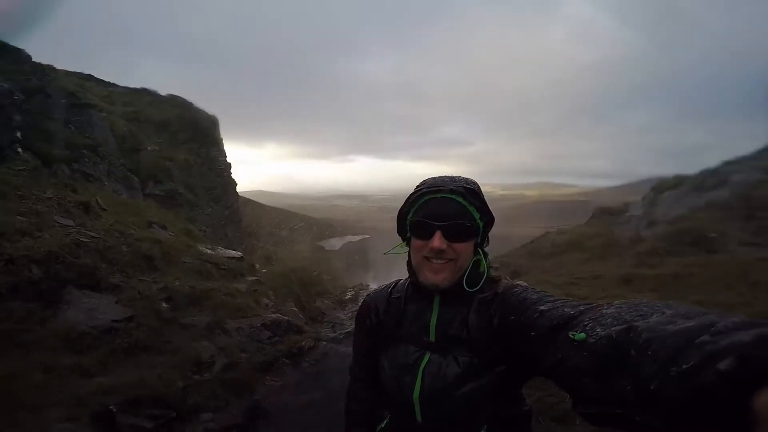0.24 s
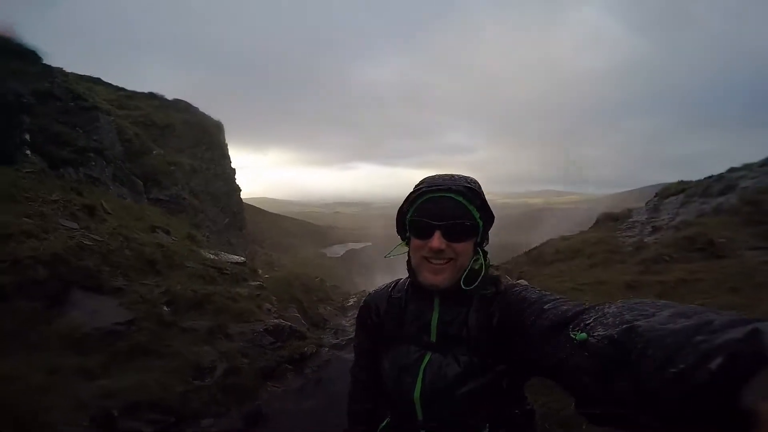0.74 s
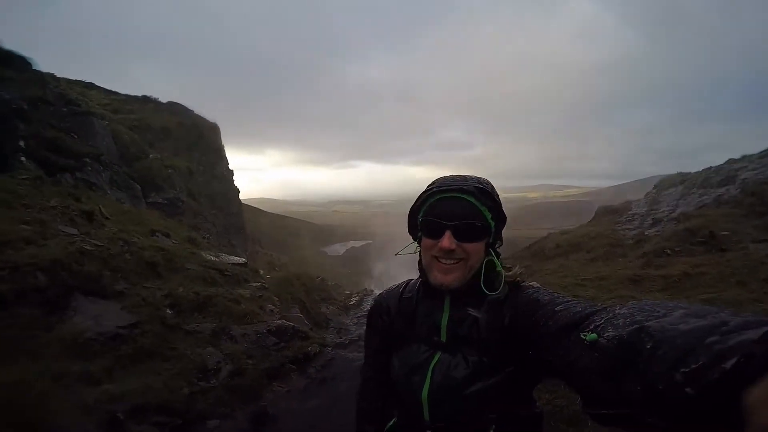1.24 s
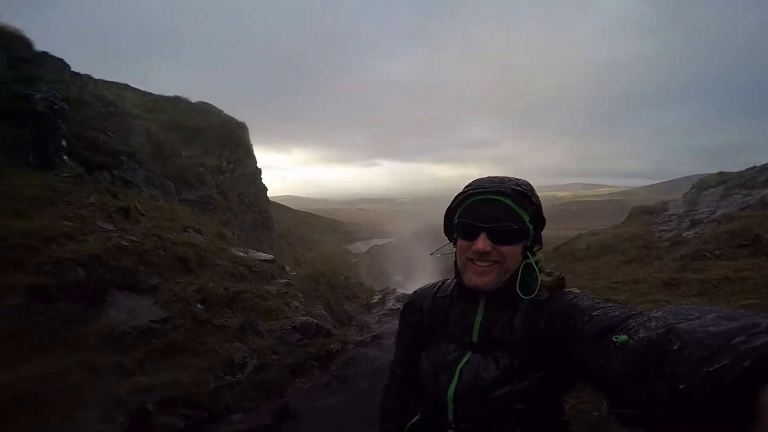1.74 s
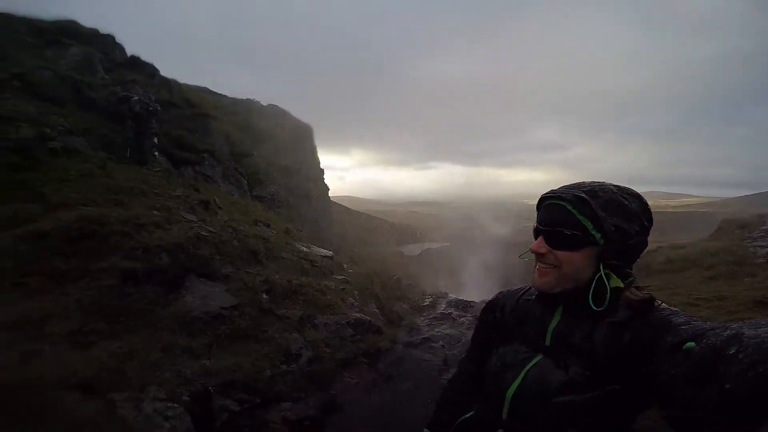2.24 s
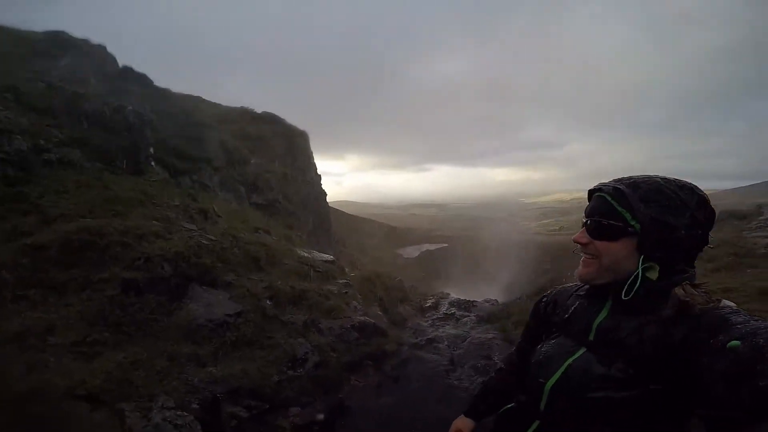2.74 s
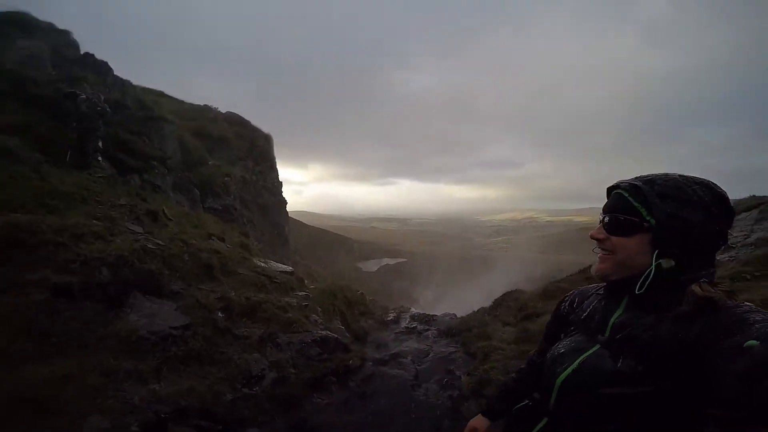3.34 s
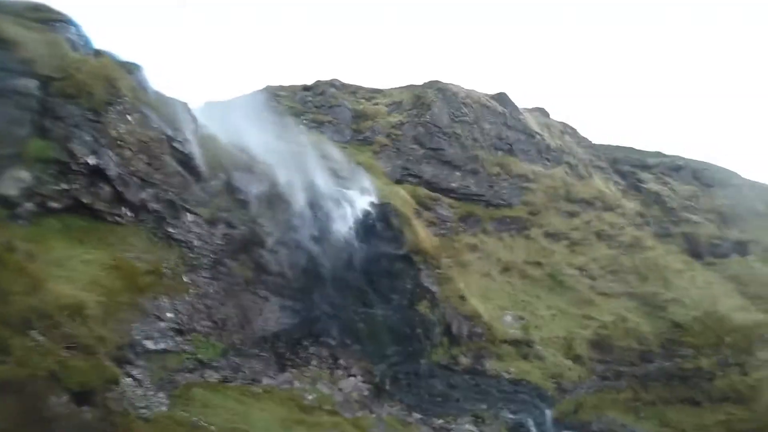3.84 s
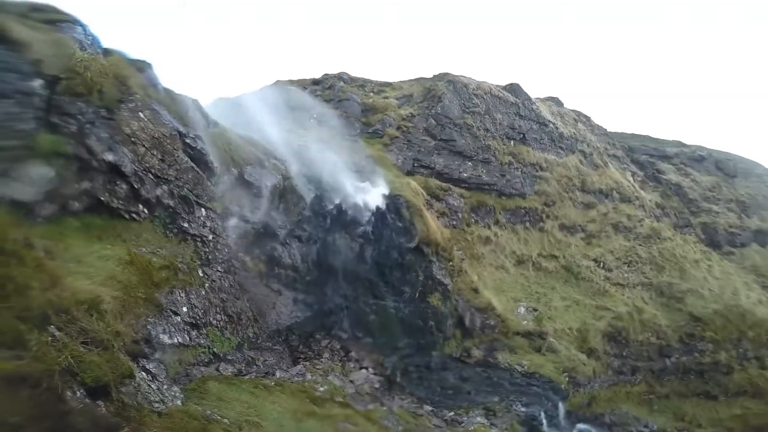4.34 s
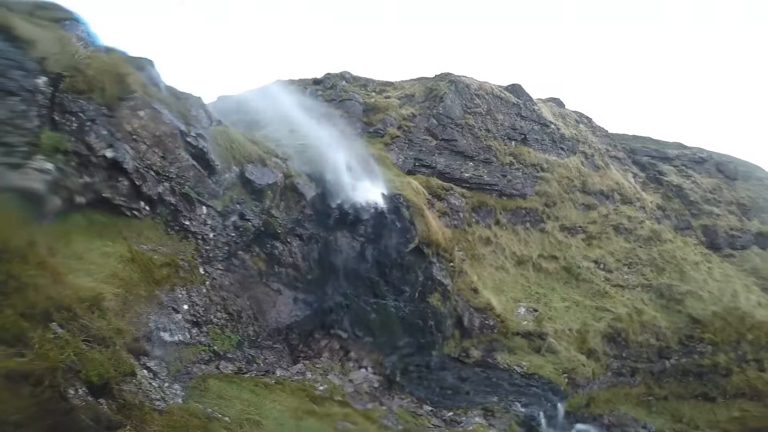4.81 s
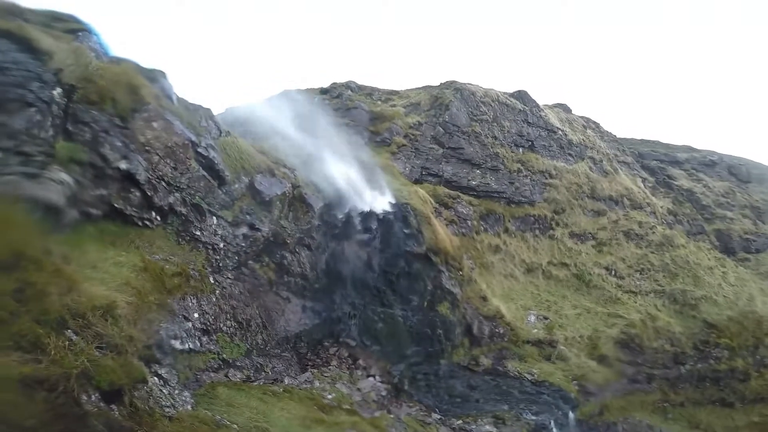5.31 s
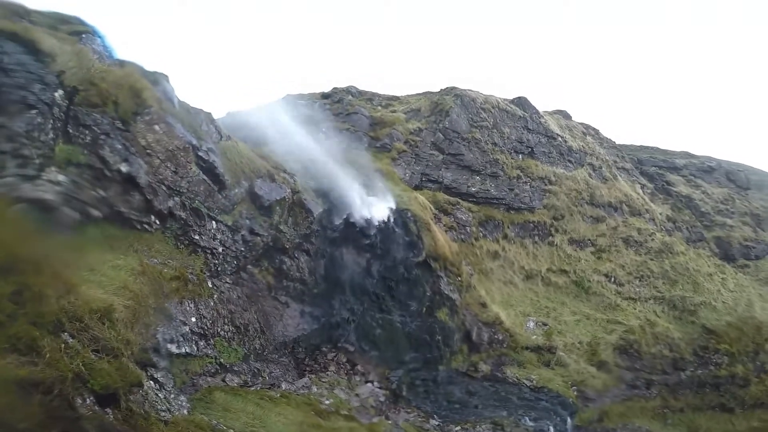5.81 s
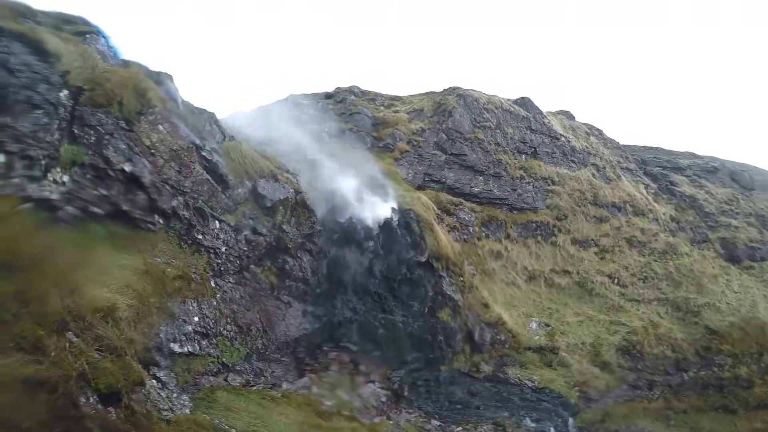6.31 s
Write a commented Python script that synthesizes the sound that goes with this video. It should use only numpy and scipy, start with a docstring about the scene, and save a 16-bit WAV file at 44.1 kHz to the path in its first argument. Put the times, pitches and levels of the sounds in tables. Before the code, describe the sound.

Water drops patter on a small camera's case in a buffeting gale; after a brief dropout, harder gusts puff against the microphone.

```python
"""Gale on a bare hillside, heard by a small camera in a hard case. From the start, eddies thump the
membrane, air rushing over the port rings its cavity, and blown spray ticks on the case over the faint
hiss of a distant waterfall. At 3.5 s the sound drops out and stutters. It resumes at another spot, where
harder gusts punch puffs into the port and the spray wets the case just once, around 5 s."""
import sys
import numpy as np
from scipy import signal
from scipy.fft import rfft, irfft
from scipy.io import wavfile
from scipy.ndimage import uniform_filter1d

SR = 44100
rng = np.random.default_rng(int(sys.argv[2]) if len(sys.argv) > 2 else 0)


def generate_wav(signal):
    """Clip the signal to [-1, 1] and save it as 16-bit WAV at the path in sys.argv[1]."""
    frames = np.transpose(np.atleast_2d(signal))
    scaled = np.clip(frames, -1, 1) * 32767
    pcm = np.round(scaled).astype(np.int16)
    wavfile.write(sys.argv[1], SR, pcm)


N = 289296

# wind rumble on the membrane, one envelope each side of the dropout: t/s, level/dB
GUST_ENVELOPES = [
    [(0.0, -41), (0.1, -31), (0.15, -40), (0.32, -38.5), (0.38, -21), (0.46, -27), (0.54, -15.5),
     (0.65, -37), (0.76, -18.5), (0.82, -25), (0.88, -19), (0.93, -28), (1.12, -36.5), (1.43, -40),
     (1.51, -23), (1.65, -38), (1.8, -32), (1.9, -46), (1.98, -31.5), (2.06, -47), (2.48, -48),
     (2.52, -28.5), (2.57, -40), (2.66, -37), (3.0, -49), (3.17, -34), (3.37, -45.5), (3.44, -27),
     (3.5, -50)],
    [(3.68, -18.5), (3.79, -13.5), (3.85, -7), (3.93, -35.5), (3.98, -24.5), (4.3, -30), (4.41, -21.5),
     (4.49, -43.5), (4.6, -23.5), (4.67, -27.5), (4.76, -15.5), (4.82, -17.5), (4.96, -40.5), (5.05, -25),
     (5.28, -31.5), (5.4, -58), (5.47, -26), (5.79, -23.5), (5.84, -36), (5.92, -25.5), (5.96, -32.5),
     (6.08, -22.5), (6.16, -30), (6.25, -24), (6.39, -23), (6.43, -29.5), (6.56, -26)],
]
# air over the port, one envelope each side of the dropout: t/s, level/dB
RUSH_ENVELOPES = [
    [(0.0, -35), (0.073, -39), (0.124, -41.5), (0.3, -32.5), (0.384, -27), (0.558, -24.5), (0.612, -38),
     (0.729, -24), (0.9, -39.5), (0.992, -32), (1.529, -33.5), (1.657, -39), (1.781, -37), (1.9, -58),
     (2.03, -41), (2.217, -59), (2.6, -51.5), (2.96, -41), (3.0, -51), (3.5, -48)],
    [(3.676, -24), (3.78, -14), (3.87, -14), (3.9, -38.5), (4.009, -41), (4.057, -27.5), (4.162, -27.5),
     (4.239, -42.5), (4.393, -38), (4.55, -51), (4.597, -26), (4.677, -25.5), (4.734, -42), (4.795, -24.5),
     (4.874, -43.5), (5.107, -25), (5.29, -42.5), (5.334, -50), (5.43, -43), (5.48, -28), (5.629, -25.5),
     (5.755, -32.5), (5.866, -38), (5.919, -24.5), (5.98, -43.5), (6.041, -26.5), (6.122, -32.5),
     (6.25, -29), (6.3, -27), (6.457, -37.5), (6.5, -32), (6.56, -23)],
]
# sudden puffs into the port: t/s, level/dB
PORT_PUFFS = [(3.6765, -15), (3.7531, -29), (3.7916, -4), (3.8365, -3), (3.9466, -10.5), (4.049, -10),
              (4.0642, -13.5), (4.179, -21), (4.379, -14), (4.3918, -10), (4.5777, -20.5), (4.658, -24),
              (4.77, -24), (4.8153, -15.5), (5.0226, -16), (5.052, -14), (5.085, -4), (5.118, -1.5),
              (5.2475, -18.5), (5.28, -19.5), (5.4953, -20), (5.61, -13.5), (5.8505, -19.5), (5.896, -7.5),
              (6.009, -11.5), (6.0775, -30), (6.235, -29), (6.2823, -8), (6.487, -10)]
# tone of the cavity behind the port: f/Hz, relative level/dB
PORT_EQ = [(180, -38), (300, -20), (535, -29), (849, -23.5), (1350, -12), (1970, -7.5), (2320, 0.5),
           (2690, -12), (3280, -17), (3690, -30), (6790, -36), (8280, -55), (9140, -38.5), (13400, -93),
           (15500, -93)]
# large drops hitting the case: t/s, peak level/dB, ring f/Hz, crack level against the ring/dB
DROP_HITS = [(.0088, -6.5, 1250, -11.5), (0.1798, -9, 1910, -13), (.1908, -17, 3040, -15),
             (.2033, -6, 1280, -6.5), (.2202, -10, 3000, -23), (0.2448, -7.5, 1400, -15),
             (0.2777, 0.5, 1300, -36), (.2906, -8, 3000, -17), (.3263, -4.5, 1350, -11),
             (0.3403, 4, 1230, -25), (0.3538, -10, 3060, -8), (0.373, -11, 5210, -16),
             (0.3881, -3.5, 3080, -12), (0.4027, -4, 1800, -16), (0.4094, -9, 2280, -30),
             (0.4299, -9, 3120, -11), (.4339, -6.5, 2960, -19), (0.4563, -4.5, 2300, -6),
             (0.4594, -3.5, 1310, -11), (0.522, -3, 1410, -21), (.5265, -4, 2100, -12),
             (0.5727, -8.5, 1850, -9), (0.678, -11, 3000, -5.5), (.6952, -5.5, 1850, 0),
             (0.7128, 5, 4410, -1), (1.042, -11, 2740, -10), (1.1249, -10, 3040, -22),
             (1.2572, -2.5, 2940, -11), (1.2632, -11, 3600, -14), (1.3897, -13, 3010, -4),
             (1.4134, -3, 2390, -7), (1.4192, -6, 2870, -17), (1.4397, -12, 2820, -2),
             (1.4595, -4.5, 1410, -23), (1.4738, -9, 1860, -4), (1.4826, -8.5, 2430, -12),
             (1.516, -7, 2380, -4), (1.5321, -10.5, 1960, -18), (1.539, -3.5, 3530, 1),
             (1.5861, -15, 2500, -3), (1.6631, -9, 2840, -2.5), (1.6816, -16, 3200, -12),
             (1.6947, -5.5, 1840, -10), (1.7213, -10, 1910, -1), (1.7684, -8.5, 3000, -5),
             (1.7928, -4.5, 2380, -31), (1.8222, -3.5, 2960, -12), (1.8438, -13, 2990, -4),
             (1.8715, -12.5, 2460, -1), (1.8745, -6, 1950, -5.5), (1.902, -20, 2040, -14),
             (1.9166, -17, 1850, 3), (1.9205, -12, 2460, -9), (1.9466, -6, 2570, -10),
             (1.957, -8, 1890, -3), (1.9843, -6.5, 2080, -17), (1.9927, 5.5, 1947, -31),
             (2.0019, 2, 2300, -8), (2.0188, -14, 1860, -17), (2.031, -9, 2000, -5),
             (2.0429, -8, 1790, -16), (2.058, -5, 2340, -21), (2.0762, -7.5, 2720, -31),
             (2.1146, -13, 2460, -18), (2.1308, -14.5, 2430, -17), (2.1741, -13.5, 1700, -6.5),
             (2.1799, -14, 2500, -16), (2.218, -12.5, 2410, -26), (2.244, -18.5, 3500, -5),
             (2.2487, -16.5, 1900, -1), (2.272, -19, 2310, -4), (2.303, -21.5, 2600, -4),
             (2.3702, -2.5, 2300, -18), (2.3856, -16, 1960, -13), (2.4, -12, 1810, -25),
             (2.4062, 1.5, 1870, -19), (2.454, -6, 2360, -22), (2.4583, -5, 2360, -30),
             (2.4774, -7, 1820, -22), (2.518, -17, 2930, -20), (2.5255, -3.5, 2710, -6.5),
             (2.542, -20, 3000, -8), (2.554, -17, 2200, -12), (2.56, -20, 3000, -6),
             (2.5718, -17, 1960, -10), (2.6616, 1.5, 1980, -14), (2.7139, -9, 2060, -34),
             (2.7295, -13, 2030, -21), (2.7468, -6, 1520, -13), (2.8016, -6.5, 1720, -2),
             (2.8057, -11, 2310, -12), (2.818, -9.5, 855, -24), (2.8235, -3.5, 2470, -21),
             (2.8304, -3, 1950, -14), (2.8363, -8, 2490, -18), (2.8424, 1.5, 2920, -25),
             (2.8628, -11, 2720, -3), (2.8752, -15, 1890, -1), (2.9004, 2.5, 3680, -10.5),
             (2.902, -11, 2700, -15), (2.9114, -8, 1200, -30), (2.939, -5.5, 2970, -6),
             (2.9544, -9, 2900, -8), (2.9574, -11.5, 2930, -10), (2.9617, -9, 2260, 1),
             (2.993, -11.5, 1910, -7), (3.0168, -13.5, 940, -23), (3.0238, -11.5, 2620, -4),
             (3.074, -0.5, 2050, -6.5), (3.1194, -6.5, 2500, -17), (3.1216, -6, 1960, -17),
             (3.1316, -5.5, 2180, -28), (3.1834, -8.5, 2460, -5), (3.2746, -3.5, 3110, -20),
             (3.2815, -7.5, 2630, 1), (3.3184, -14.5, 1150, -33), (3.3384, -2.5, 3830, -17.5),
             (3.3464, 4, 2900, -7), (3.3951, -6.5, 2060, -7), (3.4105, -12, 3260, 7),
             (3.431, -11, 2570, -4), (3.4376, -5.5, 2470, -8), (3.4664, -6.5, 3020, -9),
             (3.4944, -9.5, 2260, -20), (4.4308, -23, 3440, -9), (4.916, -11, 4520, 2),
             (4.931, -7.5, 4370, -1), (4.9508, -10, 5650, 12), (4.9789, -14.5, 6600, -7),
             (5.027, -6.5, 5600, 1.5), (5.034, -6, 4630, 8), (5.0609, -6.5, 5600, 1),
             (5.0862, -11.5, 5360, -3), (5.1166, -6.5, 2990, 17), (5.1197, 6, 2240, -12),
             (5.1254, 5.5, 4400, -24), (5.1606, -27, 3400, 5), (5.187, -26.5, 4840, -1),
             (6.1055, -27.5, 4540, 9)]
# tone of the case under a tick: f/Hz, relative level/dB
CASE_EQ = [(180, -90.5), (300, -8), (774, -15), (1840, 5.5), (2140, -5.5), (2740, 2), (4300, -4),
           (4750, -9.5), (5340, -6), (8090, -22.5), (11700, -33), (13800, -36), (16000, -118.5)]
# spells when spray wets the case: start t/s, end t/s
WET_SPELLS = [(0, 3.62), (4.91, 5.14)]
# bursts of fine spray and bright tearing: start t/s, end t/s, level/dB
SPRAY_BURSTS = [(0.06, 0.111, -39.5), (0.165, .33, -57), (0.333, 0.462, -35.5), (0.475, 0.589, -43),
                (0.637, 0.752, -47), (0.948, 1.196, -42.5), (1.194, 1.541, -39.5), (1.55, 1.607, -49),
                (1.678, 1.73, -47), (1.739, 1.82, -44), (1.83, 2.2, -61.5), (2.763, 2.968, -52.5),
                (2.97, 3.5, -61), (3.677, 3.744, -43), (3.746, 3.825, -32), (3.817, 3.861, -26.5),
                (4.027, 4.09, -54), (4.375, 4.412, -47), (4.575, 4.702, -45.5), (4.758, 4.834, -40),
                (4.902, 5.138, -50.5), (5.46, 5.66, -53), (5.89, 5.93, -54), (6.026, 6.048, -39.5),
                (6.25, 6.33, -62), (6.464, 6.56, -55)]
# tone of the distant waterfall: f/Hz, relative level/dB
WATERFALL_EQ = [(120, -47), (200, -9), (647, -13), (1500, -2), (2400, -1.5), (3430, -18), (4350, -6.5),
                (4680, -8), (5330, -10), (7300, -14), (8200, -22.5), (11700, -19.5), (14900, -30),
                (16000, -48)]
# snippets replayed inside the dropout: start t/s, end t/s, jump back/s
STUTTERS = [(3.5208, 3.5678, .0667), (3.5875, 3.6218, .1334)]

PUFF_RISE_S, PUFF_T60_S = 0.0025, 0.029
PATTER_PER_S, PATTER_HZ = 45, 2490
PATTER_OVER_SPRAY_DB, PATTER_SPREAD_DB, PATTER_CRACK_DB = 23, 2.5, -1.5
DROPOUT_S, RESUME_S, HIGH_CUT_HZ = 3.5012, 3.6762, 15600


def wind_buffet(gust_db):
    """Large eddies thump the membrane evenly; quicker, spikier small ones grow faster with the gust."""
    large = band(rng.standard_normal(N), 18.7, 54.7)
    large = unit(large / uniform_filter1d(large ** 2, int(0.054 * SR)) ** 0.35)  # compress the swells
    small = unit(undb(4.4 * walk(40)) * band(rng.standard_normal(N), 49, 126.5))
    roar = unit(undb(4 * walk(70)) * band(rng.standard_normal(N), 160, 424))
    small_gain = undb(-5 + 0.21 * (gust_db + 8.5))
    roar_gain = undb(-25.5 + 0.75 * (gust_db + 13))  # only the hardest gusts reach this high
    return undb(gust_db) * (large + small_gain * small + roar_gain * roar)


def port_rush(rush_db):
    """Turbulent air rings the cavity behind the port: a fluttering rush plus sudden puffs."""
    wet = wetness()  # spray breaks the slow surges into quick specks
    flutter_db = (2.6 - 2.4 * wet) * walk(53) + 4 * walk(220) + 3 * wet * walk(600)
    envelope = undb(rush_db) * unit(undb(flutter_db))
    t = np.arange(int(.08 * SR)) / SR
    puff = (1 - np.exp(-t / PUFF_RISE_S)) * np.exp(-np.log(1000) * t / PUFF_T60_S)
    for s, level_db in PORT_PUFFS:
        add(envelope, s, undb(level_db) * puff)
    return unit(colour(rng.standard_normal(N), PORT_EQ)) * envelope


def drop_hit(hz, crack_db, hiss):
    """A drop's push swells and collapses over a few cycles of case ring, with a crack and a rough tail."""
    t = np.arange(len(hiss)) / SR
    contact_s = 0.00054 * (2000 / hz) ** 0.26  # small, high drops touch more briefly
    push = t / contact_s * np.exp(1 - t / contact_s)
    grit = unit(band(hiss, 0.6 * hz, 1.11 * hz, order=1))
    ring = push * (np.sin(2 * np.pi * hz * t) + 0.23 * grit)
    tail = undb(-6.5) * unit(colour(hiss, CASE_EQ)) * np.exp(-t / 0.0017)
    crack = unit(band(hiss[::-1], 2330, 8600)) * push ** 2
    thump = undb(-23) * np.sin(2 * np.pi * 220 * t) * np.exp(-t / 0.0019)  # the whole case is nudged
    hit = ring / np.abs(ring).max() + tail + thump + undb(crack_db) * crack / np.abs(crack).max()
    return hit / np.abs(hit).max()


def drops_on_case(spray_db, patter_count=330):
    """Large drops, pitched by where they land, over a random patter that is louder in thick spray."""
    out = np.zeros(N)
    for s, peak_db, hz, crack_db in DROP_HITS:
        add(out, s, undb(peak_db) * drop_hit(hz, crack_db, rng.standard_normal(600)))
    draws = rng.standard_normal((patter_count, 603))  # per drop: level, pitch, crack, then its hiss
    times = np.cumsum(rng.exponential(size=patter_count)) / PATTER_PER_S
    envelope = undb(spray_db + PATTER_OVER_SPRAY_DB) * wetness()
    for s, draw in zip(times[times < N / SR], draws):
        gain = envelope[int(s * SR)] * undb(PATTER_SPREAD_DB * draw[0])
        hz = PATTER_HZ * np.exp(0.33 * draw[1])
        add(out, s, gain * drop_hit(hz, PATTER_CRACK_DB + 6 * draw[2], draw[3:]))
    return out


def fine_spray(spray_db, ticks_per_s=450, spread_db=4, shapes=6):
    """Tiny droplets tick on the case while spray blows, over a bright, fluttering tearing."""
    ticks = np.zeros(N)
    t = np.arange(300) / SR
    for _ in range(shapes):
        hits = (rng.random(N) < ticks_per_s / shapes / SR) * undb(spread_db * rng.exponential(size=N))
        grain = rng.standard_normal(len(t)) * t * np.exp(-t / .0003)
        ticks += signal.fftconvolve(hits, grain)[:N]
    flutter = undb(3.3 * walk(130))
    hiss = band(rng.standard_normal(N), 2000, 6400, order=1)
    tearing = unit(flutter * band(hiss, 460, 11000, order=1))
    wet = wetness()
    sizzle = undb(11) * wet * unit(colour(ticks, CASE_EQ))
    return undb(spray_db) * (sizzle + undb(-1.5 + 2.7 * wet) * tearing)


def spray_envelope_db(drizzle_db=-61.5, fade_s=0.028):
    """Spray blows in soft-edged bursts, on top of a drizzle that lasts while the case is wet."""
    now = np.arange(N) / SR
    bursts = sum(undb(db) * ((now > start) & (now < end)) for start, end, db in SPRAY_BURSTS)
    envelope = uniform_filter1d(undb(drizzle_db) * wetness() + bursts, int(fade_s * SR))
    return 20 * np.log10(np.abs(envelope) + 1e-5)


def wetness():
    """Gate: 1 while spray wets the case, else 0."""
    now = np.arange(N) / SR
    return sum((now > start) & (now < end) for start, end in WET_SPELLS)


def waterfall(level_db=-48.5):
    """Distant falling water lays a steady bed of hiss."""
    return undb(level_db) * unit(colour(rng.standard_normal(N), WATERFALL_EQ))


def undb(db):
    """dB to gain."""
    return 10 ** (np.asarray(db) / 20)


def unit(x):
    """Scale to rms 1."""
    return x / np.sqrt(np.mean(x ** 2))


def fader_db(envelopes):
    """Join envelopes into one fader ride, with straight ramps between the points."""
    s, db = np.concatenate(envelopes).T
    return np.interp(np.arange(N) / SR, s, db)


def colour(x, eq, size=2048):
    """Minimum-phase EQ through (f/Hz, level/dB) points, built from the folded cepstrum."""
    hz, db = np.transpose(eq)
    log_hz = np.log(np.maximum(np.arange(size // 2 + 1), 1) * SR / size)
    cepstrum = irfft(np.interp(log_hz, np.log(hz), db) * np.log(10) / 20)
    cepstrum[1:size // 2] *= 2
    cepstrum[size // 2 + 1:] = 0
    return signal.fftconvolve(x, irfft(np.exp(rfft(cepstrum))))[:len(x)]


def band(x, lo_hz, hi_hz, order=2):
    """Butterworth band-pass."""
    return signal.sosfilt(signal.butter(order, [lo_hz, hi_hz], "bandpass", fs=SR, output="sos"), x)


def walk(rate_hz):
    """Random modulator: slewed sample-and-hold, rms 1."""
    hold = int(SR / rate_hz)
    steps = np.repeat(rng.standard_normal(N // hold + 1), hold)
    return unit(uniform_filter1d(steps, hold)[:N])


def add(out, s, sound):
    """Mix a short sound in at s seconds."""
    i = int(s * SR)
    out[i:i + len(sound)] += sound[:N - i]


def scene():
    """Mono mix: wind up front, drops and spray on the case, the waterfall far behind."""
    bed = waterfall()
    wind = wind_buffet(fader_db(GUST_ENVELOPES)) + port_rush(fader_db(RUSH_ENVELOPES))
    spray_db = spray_envelope_db()
    return (wind + drops_on_case(spray_db) + fine_spray(spray_db) + bed)[None]


def record(dry):
    """The stream stalls and replays two snippets before it resumes; peaks are rounded, the top is cut."""
    out = dry.copy()
    out[:, int(DROPOUT_S * SR):int(RESUME_S * SR)] = 0
    for start, end, back in STUTTERS:
        snippet = np.arange(int(start * SR), int(end * SR))
        out[:, snippet] = dry[:, snippet - int(back * SR)]
    out = .82 * out / (1 + out ** 6) ** (1 / 6)  # soft saturation
    return signal.sosfilt(signal.ellip(8, .2, 70, HIGH_CUT_HZ, fs=SR, output="sos"), out)


dry = scene()
out = record(dry)
generate_wav(out)
```